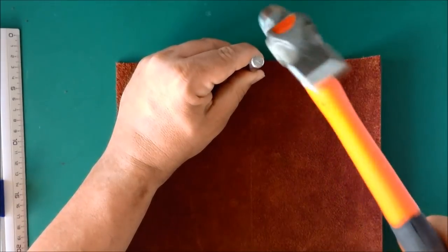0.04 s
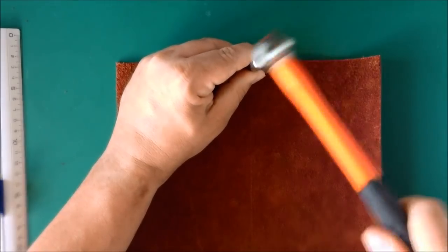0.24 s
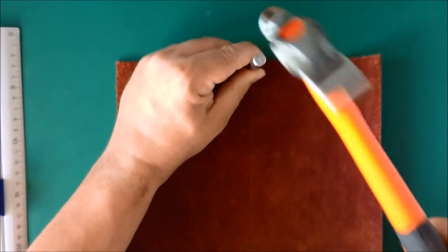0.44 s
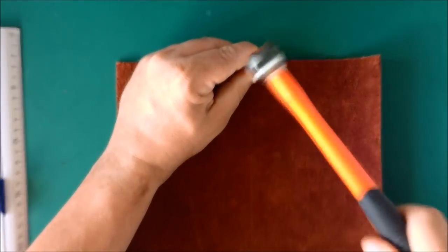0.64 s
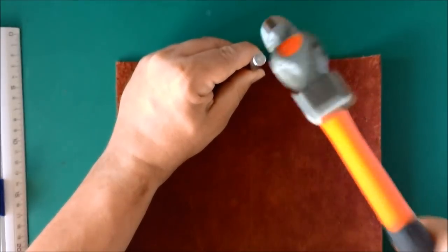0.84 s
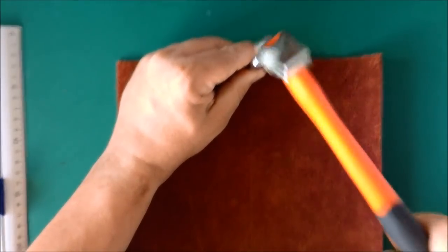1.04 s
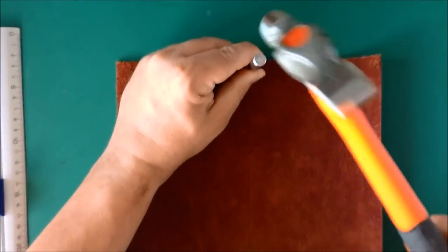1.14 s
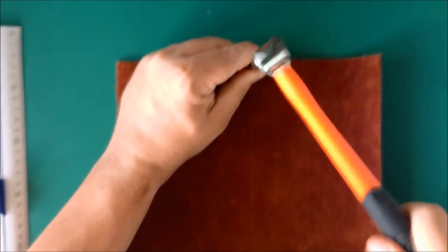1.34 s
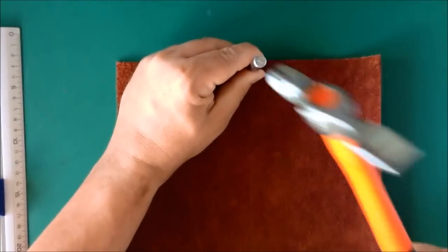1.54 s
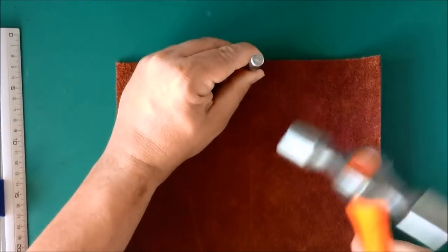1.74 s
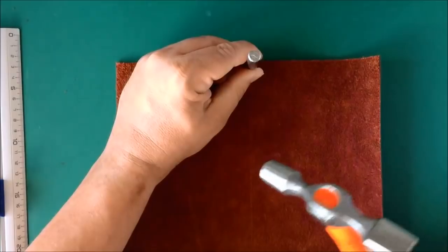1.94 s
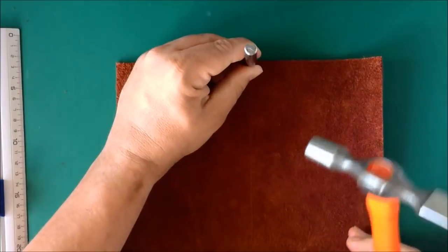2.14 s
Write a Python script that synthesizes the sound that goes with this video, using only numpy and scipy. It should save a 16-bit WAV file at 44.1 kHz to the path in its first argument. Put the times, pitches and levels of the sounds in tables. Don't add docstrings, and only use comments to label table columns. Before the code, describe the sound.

Four evenly spaced hammer blows on a steel punch, hard cracks with hollow bench thuds, quiet room

```python
import sys
import numpy as np
from scipy import signal
from scipy.io import wavfile
from scipy.ndimage import uniform_filter1d

SR = 44100
rng = np.random.default_rng(int(sys.argv[2]) if len(sys.argv) > 2 else 0)


def wrap_up_sound(samples):
    columns = np.atleast_2d(samples).T
    tamed = np.clip(columns, -1, 1)
    steps = np.round(tamed * 32767).astype(np.int16)
    wavfile.write(sys.argv[1], SR, steps)


def elevation(decibels):
    levels = np.asarray(decibels, float)
    return 10 ** (levels / 20)


N = 97064

# start in seconds, crack level in dB, thud level in dB, thud tilt in dB per octave,
# level of the lasting rings in dB.
BLOWS = [
    (0.3277, 0, -1, -5.5, 4.5),
    (.6943, -3.5, -0.5, 5, 1),
    (1.0293, -3, 0.5, 1.5, -2.5),
    (1.3657, 0.5, 2.5, 1, -4.5),
]
# delay after the first in seconds, level in dB.
TOUCHES = [
    (0, -16),
    (.0007, -9),
    (.0013, -4),
    (.002, 2),
    (.0026, -7.5),
    (.0034, -11.5),
    (.0045, -8.5),
    (.0056, -13),
    (.007, -16.5),
]
# start in seconds, level in dB, tilt in dB per octave.
HOPS = [(.45, -44.5, 1.5), (0.515, -42.5, -7), (.56, -57.5, -12), (.82, -58, 0), (0.88, -56.5, 13),
        (.93, -52, -15), (1.155, -46.5, -2), (1.216, -46, -3.5), (1.261, -51.5, -8), (1.555, -53, 0),
        (1.595, -50, -13), (1.621, -70, -14)]
# frequency in Hz, level in dB, 60 dB decay time in seconds.
STEEL_MODES = [(1304, -7, 0.015), (2170, 1.5, 0.0094), (3130, 2, 0.0061), (3730, -1, 0.0062),
               (4650, -4.5, .009), (5290, 2, 0.0071), (6500, -9, 0.015), (8530, -8.5, 0.0068),
               (9120, -8, 0.0033), (11080, -11, 0.0064), (13320, -16, 0.0076), (14400, -17, .005)]
# frequency in Hz, level in dB, 60 dB decay time in seconds.
STEEL_RINGS = [(2700, -58.5, 0.34), (3005, -57.5, 0.12), (4480, -56, 0.22), (5300, -61.5, .2)]
# frequency in Hz, level in dB, 60 dB decay time in seconds.
BENCH_MODES = [(128, -16.5, 0.04), (187, -15.5, 0.067), (223.6, -5, 0.12), (270, -3.5, .05),
               (314, -8.5, .06), (393, -4.5, 0.15), (417, 0.5, .012), (556.5, -2, 0.14), (635, -5.5, .045),
               (676, -2, .045), (770, -8, 0.032), (994, -23.5, 0.15), (1254, -21.5, 0.098),
               (1410, -25, .04)]
# frequency in Hz, level in dB per Hz.
TAIL_SPECTRUM = [(60, -33), (200, -5.5), (500, -7.5), (850, -15.5), (2800, -22.5), (5200, -29.5),
                 (9000, -40), (15000, -51.5)]
# frequency in Hz, 60 dB decay time in seconds.
TAIL_T60 = [(60, .3), (200, 0.16), (500, 0.089), (1100, .24), (2900, 0.22), (5000, 0.28), (7700, 0.18),
            (15000, .16)]
# frequency in Hz, level in dB per Hz.
SHUDDER_SPECTRUM = [(50, -23), (110, -11), (200, -2), (300, -1), (450, -17), (900, -39), (2000, -83)]
# frequency in Hz, level in dB per Hz.
HISS_SPECTRUM = [(45, -48.5), (110, -22.5), (200, -8.5), (450, -12), (750, -17), (3300, -19), (6000, -24),
                 (14500, -27.5)]
# time in seconds, level in dB.
HISS_LEVEL = [(0.0, -64), (0.17, -69), (0.62, -71), (1.08, -74.5), (1.18, -74.5), (1.4, -75), (1.53, -67.5),
              (1.84, -70.5), (2.2, -67)]
# frequency in Hz, bandwidth in Hz, level in dB.
HUMS = [(437, 79, -73.5), (1500, 300, -79.5), (3010, 870, -75.5), (4330, 250, -78)]
# frequency in Hz, level in dB.
SMEAR_LOWS = [(240, -48), (330, -51.5), (520, -53.5), (690, -53)]


def at_hz(points, hz):
    points = np.array(points)
    return np.interp(np.log(hz), np.log(points[:, 0]), points[:, 1])


def rms_one(x):
    return x / np.sqrt(np.mean(x ** 2) + 1e-20)


def clicks(s, gain):
    out = np.zeros(N) + 1e-18
    np.add.at(out, (np.asarray(s) * SR).astype(int), gain)
    return out


def ring(x, hz, t60):
    r = elevation(-60 / (t60 * SR))
    w = 2 * np.pi * hz / SR
    return signal.lfilter([0, np.sin(w)], [1, -2 * r * np.cos(w), r * r], x)


def narrow_noise(hz, width_hz):
    t60 = np.log(1000) / np.pi / width_hz
    return rms_one(ring(rng.standard_normal(N), hz, t60))


def soften(x, hz):
    r = np.exp(-2 * np.pi * hz / SR)
    return signal.lfilter([(1 - r) ** 2], [1, -2 * r, r * r], x)


def highpass(x, order, hz):
    return signal.sosfilt(signal.butter(order, hz, "high", fs=SR, output="sos"), x)


def drift(hz):
    settled = soften(rng.standard_normal(N + SR), hz)[SR:]
    return rms_one(settled)


def since_blow():
    return np.maximum(np.arange(N) / SR - np.array(BLOWS)[:, :1], 0)


def bands(spectrum, shape):
    edges = 45 * 2 ** np.arange(0, 8.7, 1 / 3)
    centres = np.sqrt(edges[1:] * edges[:-1])
    white = rng.standard_normal((2, N))
    norm = np.sqrt(np.sum(elevation(at_hz(spectrum, centres)) ** 2 * np.diff(edges)) * 2 / SR)
    out = 0
    for k, hz in enumerate(centres):
        band_filter = signal.butter(2, edges[k:k + 2], "band", fs=SR, output="sos")
        band = signal.sosfilt(band_filter, white[k % 2])
        out = out + elevation(at_hz(spectrum, hz)) * shape(hz) * band
    return out / norm


def hiss():
    duck_db, recover_s, duck_above_hz = -13.5, 0.16, 10000
    t = since_blow()
    duck = duck_db * np.max((t > 0) * np.exp(-(t / recover_s) ** 2), axis=0)
    level = np.interp(np.arange(N) / SR, *np.transpose(HISS_LEVEL))
    air = bands(HISS_SPECTRUM, lambda hz: elevation(duck * hz / (hz + duck_above_hz)))
    hums = sum(elevation(db) * narrow_noise(hz, width_hz) for hz, width_hz, db in HUMS)
    return elevation(level) * air + elevation(level - level.mean()) * hums


def smear(x):
    reach_s, from_db = 0.0232, -20.5
    low_db, low_rise_s = 5.5, 0.0058
    tone_db, tone_rise_s, tone_hz = -48, 0.006, 3000
    copy_db, haze_db = -40.5, -62
    ahead = np.arange(int(reach_s * SR), 0, -1) / SR
    lows = sum(elevation(low_db + db) * np.cos(2 * np.pi * hz * ahead) for hz, db in SMEAR_LOWS)
    kernel = lows * np.exp(-ahead / low_rise_s)
    kernel += elevation(tone_db) * np.cos(2 * np.pi * tone_hz * ahead) * np.exp(-ahead / tone_rise_s)
    kernel += elevation(haze_db) * soften(rng.standard_normal(len(ahead)), 3000)
    kernel[0] += elevation(copy_db)
    power = uniform_filter1d(x ** 2, size=200)
    loud = x * power / (power + elevation(from_db) ** 2)
    return x + signal.fftconvolve(loud, kernel)[-N:]


def gate(t):
    close_s, soft_s = 0.18, 0.0068
    return 1 / (1 + np.exp((t - close_s) / soft_s))


def steel():
    crack_db, jitter_s, spread_db = -10.5, 0.0002, 1.5
    ring_lag_s, ring_db_offset, ring_spread_db, ring_width_hz = 0.002, 19, 2.5, 220
    s, db, _, _, ring_db = np.transpose(BLOWS)[:, :, None]
    lag, touch_db = np.transpose(TOUCHES)
    out = 0
    for hz, mode_db, t60 in STEEL_MODES:
        chance = rng.standard_normal((len(s), 2, len(lag)))
        when = s + lag + jitter_s * np.abs(chance[:, 0])
        gain = elevation(crack_db + db + touch_db + mode_db + spread_db * chance[:, 1])
        out = out + ring(clicks(when.ravel(), gain.ravel()), hz, t60)
    t = since_blow()
    is_open = (t > ring_lag_s) * gate(t)
    for hz, mode_db, t60 in STEEL_RINGS:
        chance_db = ring_spread_db * rng.standard_normal((len(s), 1))
        decay = elevation(mode_db + ring_db_offset + ring_db + chance_db - 60 * t / t60)
        out += np.sum(is_open * decay, axis=0) * narrow_noise(hz, ring_width_hz)
    return out


def bench():
    base_db, lag_s, contact_hz, spread_db = -15.5, 0.0018, 1200, 1
    push_s, push_db = 0.0023, -1
    rebound_s, rebound_db = 0.0085, -2
    hop_base_db, hop_spread_db, hop_damping = -3, 1.3, 0.52
    s, _, thud_db, thud_tilt_db, _ = np.transpose(BLOWS)
    hop_s, hop_db, hop_tilt_db = np.transpose(HOPS)
    thud_s = s + lag_s
    out = 0
    for hz, mode_db, t60 in BENCH_MODES:
        chance_db = spread_db * rng.standard_normal(len(s))
        gain = elevation(base_db + thud_db + mode_db + thud_tilt_db * np.log2(hz / 400) + chance_db)
        blow = clicks(thud_s, gain)
        blow += clicks(thud_s + push_s, gain * elevation(push_db))
        blow += clicks(thud_s + rebound_s, gain * elevation(rebound_db))
        hop_chance_db = hop_spread_db * rng.standard_normal(len(hop_s))
        hop_gain = elevation(hop_base_db + hop_db + mode_db + hop_tilt_db * np.log2(hz / 300) + hop_chance_db)
        hop = clicks(hop_s, hop_gain)
        out = out + ring(blow, hz, t60) + ring(hop, hz, hop_damping * t60)
    return highpass(soften(out, contact_hz), 3, 165)


def room():
    tail_db, rise_s, grain_db = -29.5, 0.005, 1
    t = since_blow()
    thud_gain = elevation(np.transpose(BLOWS)[2])
    rise = (1 - np.exp(-t / rise_s)) * gate(t)
    grain = elevation(grain_db * drift(110))

    def decay(hz):
        fall = elevation(-60 * (t - 0.04) / at_hz(TAIL_T60, hz))
        return thud_gain @ (rise * fall) * grain

    return elevation(tail_db) * bands(TAIL_SPECTRUM, decay)


def shudder():
    level_db, rise_s, t60, lasts_s, stop_s, lumps_db = -48, 0.012, 1, 0.28, 0.004, 3.5
    t = since_blow()
    stop = 1 + np.exp((t - lasts_s) / stop_s)
    course = np.sum((1 - np.exp(-t / rise_s)) * elevation(-60 * t / t60) / stop, axis=0)
    lumpy = course * elevation(lumps_db * drift(25))
    return elevation(level_db) * bands(SHUDDER_SPECTRUM, lambda hz: lumpy)


def scene():
    return (hiss() + steel() + bench() + room() + shudder())[None]


def top_cut(x):
    return signal.sosfilt(signal.butter(12, 16470, fs=SR, output="sos"), x)


def record(dry):
    peak_limit, top_cut_hz = 1.4, 15400
    x = highpass(smear(dry[0]), 2, 85.4)
    rounded = peak_limit * np.tanh(x / peak_limit)
    x = signal.sosfilt(signal.cheby2(8, 22, top_cut_hz, fs=SR, output="sos"), rounded)
    return top_cut(np.clip(x, -0.97, 0.97)[None])


dry = scene()
out = record(dry)
wrap_up_sound(out)
```